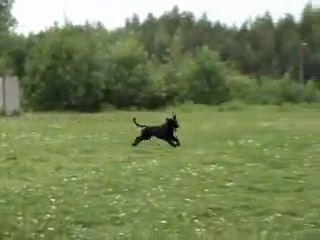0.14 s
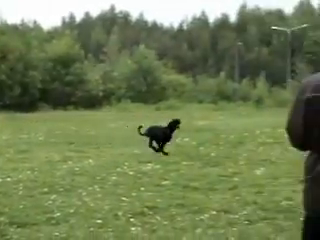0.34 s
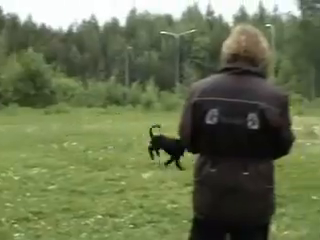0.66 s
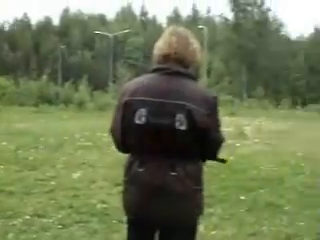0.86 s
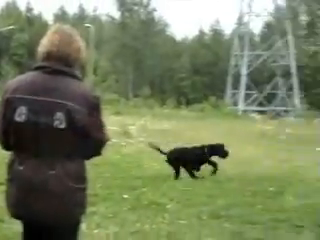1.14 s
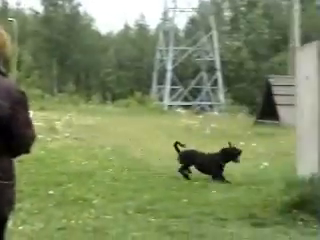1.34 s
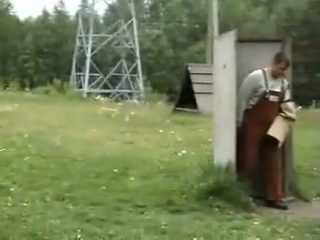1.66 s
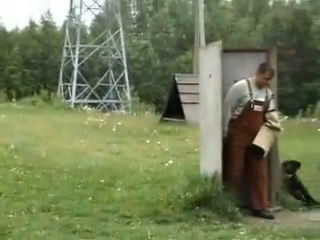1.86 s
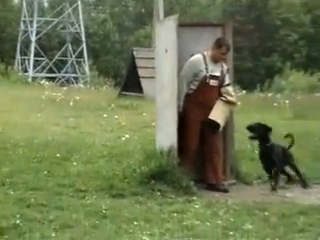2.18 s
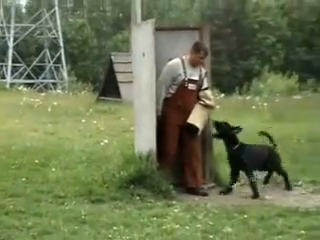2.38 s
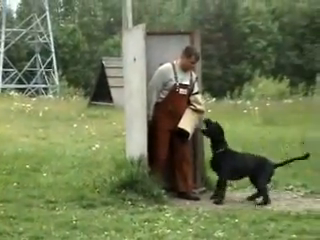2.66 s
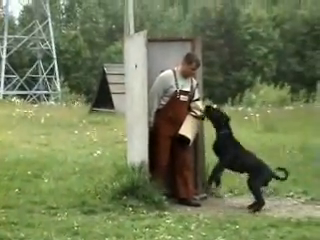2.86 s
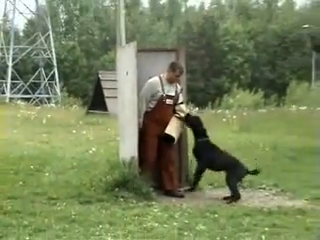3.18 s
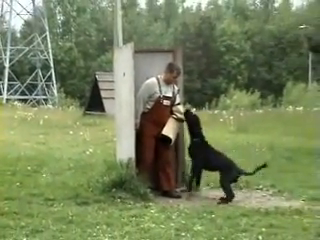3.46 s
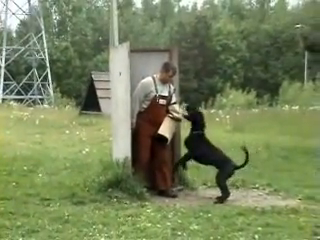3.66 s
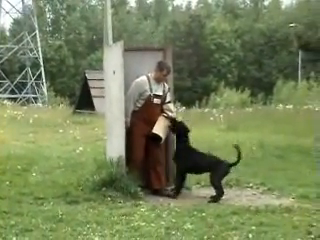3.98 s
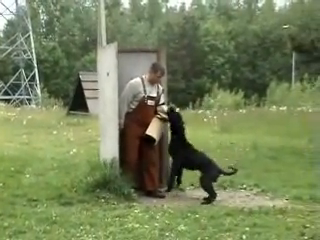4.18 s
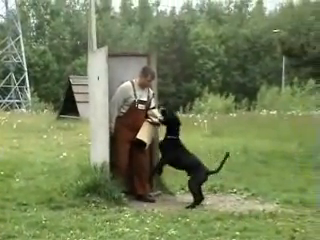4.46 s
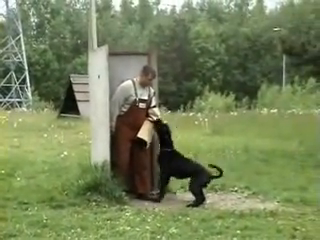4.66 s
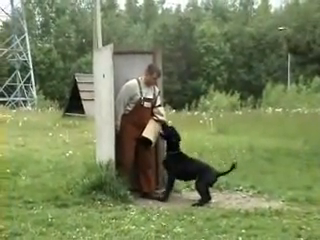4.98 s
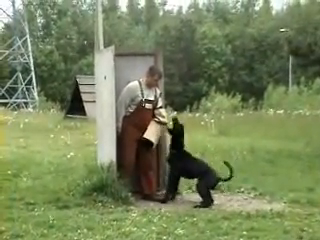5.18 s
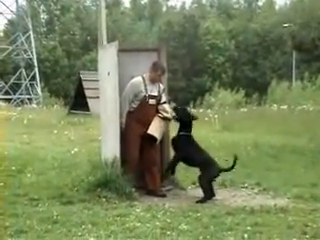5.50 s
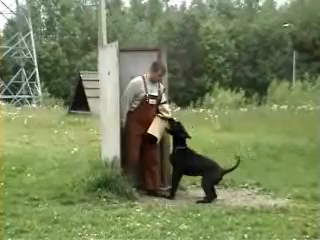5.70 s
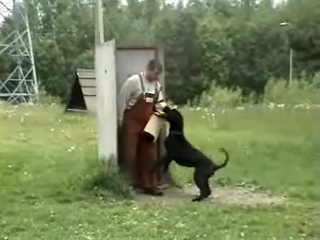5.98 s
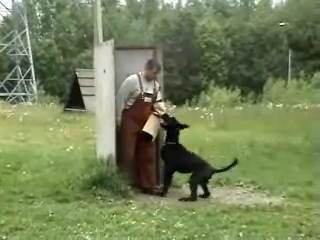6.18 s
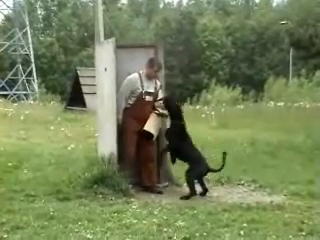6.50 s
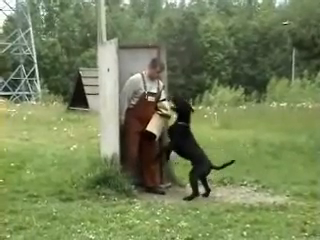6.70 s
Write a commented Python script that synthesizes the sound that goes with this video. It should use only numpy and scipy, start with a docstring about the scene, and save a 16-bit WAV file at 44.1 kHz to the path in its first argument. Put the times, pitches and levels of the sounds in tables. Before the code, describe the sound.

Thirteen rough, loud barks from a big dog outdoors, with a short pause after the first four, slight close echoes and soft grass rustle.

```python
"""A large dog barks hoarsely thirteen times in an open field, with the same faint close echoes throughout.
Each bark is a train of rough slaps and puffs of air that rings the chest, throat, mouth and muzzle.
The boards of a wooden hide send back the close echoes, and a tree line returns a faint tail.
Paws rustle in the grass as a crackle that swells and fades; far road noise is a hum of shaped noise."""
import sys
import numpy as np
from scipy import signal
from scipy.fft import rfft, irfft
from scipy.io import wavfile
from scipy.ndimage import uniform_filter1d, minimum_filter1d

SR = 44100
rng = np.random.default_rng(int(sys.argv[2]) if len(sys.argv) > 2 else 0)


def wav_record(signal):
    """Record a signal, one row per channel, as 16-bit PCM in the file named by sys.argv[1]."""
    frames = np.transpose(np.atleast_2d(signal))
    bounded = np.clip(frames, -1, 1)
    # unit amplitude maps onto the largest positive 16-bit level
    quanta = np.round(bounded * 32767).astype(np.int16)
    wavfile.write(sys.argv[1], SR, quanta)


def ratio_of_db(decibels):
    """Turn decibels (scalar or array-like) into linear amplitude factors; 0 dB maps to 1."""
    return 10 ** (np.asarray(decibels, float) / 20)


N = 301644  # length of the scene in samples


def read(points, hz):
    """Value of a (frequency [Hz], value) table at hz, straight on a log-frequency axis."""
    f, value = np.transpose(points)
    return np.interp(np.log(hz + 1), np.log(f + 1), value)


def evened(x):
    """Scales to rms 1."""
    return x / np.sqrt(np.mean(x ** 2) + 1e-20)


def add(mix, s, sound):
    """Mixes sound in at time s, in seconds."""
    part = mix[round(s * SR):][:len(sound)]
    part += sound[:len(part)]


def colour(x, points):
    """Filters x by a (frequency [Hz], gain [dB]) spectrum."""
    gain = ratio_of_db(read(points, np.fft.rfftfreq(x.shape[-1], 1 / SR)))
    return irfft(rfft(x) * gain, x.shape[-1])


def resonate(x, hz, width):
    """A hollow that rings: two-stage resonance, width in Hz, that follows the pitch curve hz; rms 1."""
    turn = np.exp(2j * np.pi * np.cumsum(hz * np.ones(len(x))) / SR)
    r = np.exp(-np.pi * width / SR)
    # turn the pitch down to zero, smooth twice, then turn it back up
    smoothed = signal.lfilter([1], np.convolve([1, -r], [1, -r]), x / turn)
    return evened((turn * smoothed).real)


def wander(size, span):
    """Smooth chance, rms 1, changing over about span samples."""
    once = uniform_filter1d(rng.standard_normal(size), round(span))
    return evened(uniform_filter1d(once, round(span)))


def dog():
    """All the barks in a row, each with its own effort, pitch, mouth, folds and tongue."""
    # one list a bark, of (time [s], effort [dB], jaw opening as mouth level over throat level [dB])
    bark_rows = [
        [(.47, -36, 3), (.503, -18, -1), (.514, -6.5, 10), (.56, -10, 6), (.598, -12.5, 3.5), (.626, -26.5, 8),
         (.67, -34.5, 7)],
        [(.815, -35.5, 0), (.843, -14.5, 4.5), (.871, -9, -5.5), (.895, -8, 4.5), (.92, -17.5, 0.5),
         (.963, -21.5, -4), (1.0, -33.5, -5)],
        [(1.14, -37, -0.5), (1.166, -20.5, 6.5), (1.176, -16, 8), (1.216, -9, 0.5), (1.24, -13.5, -3.5),
         (1.288, -26, -4.5), (1.31, -24, -19), (1.345, -36, -12)],
        [(1.49, -35, -2), (1.515, -20, 0), (1.528, -6, 3), (1.546, -7.5, -12.5), (1.568, -11, 0.5),
         (1.6, -17, -11), (1.63, -26, -7.5), (1.675, -36, -8.5)],
        [(2.865, -35.5, 0), (2.9, -23.5, -3), (2.913, -9, -8.5), (2.937, -13, 5.5), (2.957, -4.5, -6.5),
         (2.98, -12, 10), (3.015, -20.5, -9), (3.031, -17, -4.5), (3.075, -28.5, -17), (3.09, -32, -11)],
        [(3.225, -48.5, 3.5), (3.245, -29, -3.5), (3.257, -7.5, -3.5), (3.28, -13, 0.5), (3.305, -6, 10),
         (3.325, -16.5, 3), (3.351, -12.5, 1), (3.395, -25, -11.5), (3.43, -35, -6.5)],
        [(3.535, -34.5, 10), (3.553, -14, 10), (3.571, -8.5, -6), (3.6, -13, -5), (3.635, -5, 4.5),
         (3.663, -18.5, -11), (3.685, -19.5, -10.5), (3.74, -29.5, -10.5)],
        [(3.88, -34, 8.5), (3.9, -20, 6), (3.914, -7.5, -9), (3.946, -9.5, 2.5), (3.985, -13, 11.5),
         (4.0, -23, 5), (4.014, -21, 1.5), (4.05, -22, -13.5), (4.085, -32.5, -10)],
        [(4.26, -32, -4.5), (4.294, -21, 2), (4.304, -8, 1.5), (4.334, -16, -1), (4.346, -9.5, 9),
         (4.378, -13.5, 14), (4.392, -24, 5.5), (4.44, -26.5, -17), (4.46, -33, -4.5)],
        [(4.715, -37, 2), (4.745, -20, 2), (4.763, -7.5, 0), (4.79, -10, 12), (4.843, -21, 2),
         (4.865, -14, 3.5), (4.893, -21.5, -14.5), (4.925, -34, 1)],
        [(5.315, -51.5, 6), (5.327, -22, 10), (5.342, -8, 6.5), (5.37, -13, 11.5), (5.415, -10.5, 14),
         (5.437, -29, 0), (5.473, -22.5, -4.5), (5.51, -38, -7)],
        [(5.93, -33, 11), (5.946, -21, 10), (5.958, -8.5, 7), (5.99, -10, 12), (6.022, -12, 11),
         (6.036, -25.5, 3.5), (6.065, -25, -2), (6.082, -18.5, 0.5), (6.12, -34.5, -11)],
        [(6.525, -43.5, 5), (6.537, -20.5, 10), (6.549, -8.5, 3), (6.583, -10.5, 14), (6.625, -21, 19),
         (6.641, -27, 5), (6.657, -19.5, 12), (6.7, -38, -0.5)],
    ]
    # one row a bark: (onset time [s], throat pitch [Hz], how long it holds [s],
    # throat pitch after the break, before any sag [Hz])
    voices = [(0.511, 513.5, 0.086, 473), (.84, 563.6, 0.07, 444), (1.17, 540, 0.046, 441.3),
              (1.52, 543.1, .045, 428), (2.908, 593.4, 0.061, 460.8), (3.257, 615.7, 0.048, 446.2),
              (3.558, 628, .065, 465.4), (3.908, 654.6, 0.053, 497.2), (4.299, 639.6, .035, 418),
              (4.754, 623, 0.049, 421), (5.335, 641, 0.045, 479.7), (5.953, 618.2, 0.059, 438.5),
              (6.546, 645, 0.033, 516.5)]
    # one row a bark: (mouth pitch at onset [Hz], mouth glide [Hz per s],
    # muzzle level against the effort [dB], boost as the lips part again [dB])
    mouths = [(1593, -5000, -6, 1), (1517, -3000, -8.5, 6), (928, 2, -3.5, 14), (1133, 1505, -6.5, 10.5),
              (1017, 1005, -21, 15.5), (873, -300, -12, 6.5), (1106, 1, -15, 8), (844, 803, -16, 14),
              (1010, -4, -15.5, 15.5), (995, -1200, -12.5, 6), (1010.4, -400, -21.5, 12.5),
              (991, 206, -21, 10.5), (1021, -200, -18.5, 12)]
    # one row a bark: (throat cycles per fold slap [count], roughness of the free folds [0-1])
    folds = [(1, .65), (1, .55), (1, .65), (1, .55), (2, .45), (1.5, .4), (2, .55), (2, .45), (1.5, .55),
             (1.5, .55), (3, .6), (2, .6), (1, .6)]
    # a second mouth resonance set by the tongue, one row a bark:
    # (pitch [Hz], level against the mouth band [dB])
    tongues = [(985, -1), (982, 0.5), (1500, -6.5), (1643, -10), (1490, -14), (1360, -6), (1530, -8.5),
               (1360, -15.5), (1480, -12), (1363, -10), (1530, -18.5), (1510, -14.5), (1364, -16.5)]
    barks = np.zeros(N)
    for rows, voice, mouth, fold, tongue in zip(bark_rows, voices, mouths, folds, tongues):
        add(barks, rows[0][0], bark(shape(rows, *voice, *mouth), *fold, *tongue))
    return barks


def shape(rows, onset, top_hz, hold, low_hz, start_hz, glide, muzzle_db, lips_db):
    """Effort is shared between throat and mouth by the jaw; pitch and lips follow the time since onset."""
    s, *columns = np.transpose(rows)
    t = np.arange(s[0], s[-1], 1 / SR)
    effort_db, jaw_db = (np.interp(t, s, c) for c in columns)
    age = t - onset
    # after its hold the throat pitch drops a step within 15 ms and also sags, down to a floor
    break_s, sag_hz_per_s, throat_floor_hz = .015, 1500, 330.4
    broken = np.clip((age - hold) / break_s, 0, 1)
    sag_hz = sag_hz_per_s * np.maximum(age - hold, 0)
    throat_hz = np.maximum(top_hz + (low_hz - top_hz) * broken - sag_hz, throat_floor_hz)
    throat_db = effort_db - 10 * np.log10(1 + ratio_of_db(jaw_db) ** 2)
    mouth_db = throat_db + jaw_db
    mouth_hz = start_hz + glide * np.maximum(age, 0)
    # the lips part once more after the onset and brighten the muzzle
    lips_s, lips_span_s = 0.1265, 0.0099
    parted_db = lips_db * np.exp(-((age - lips_s) / lips_span_s) ** 2)
    parted_db += 0.32 * jaw_db  # a wider jaw also lifts the muzzle
    parted_db += 300 * np.minimum(age, 0)  # dB per s: before the onset the muzzle is still opening
    return throat_hz, throat_db, mouth_hz, mouth_db, effort_db + muzzle_db + parted_db


def fold_drive(throat_hz, throat_db, mouth_hz, mouth_db, cycles, rough):
    """Vocal folds slap unevenly in step with throat or mouth; a noisy puff of air follows each slap."""
    size = len(throat_hz)
    free_hz = throat_hz / cycles
    # a ringing mouth pulls the folds onto a whole fraction of its own pitch, and steadies them
    locked = mouth_db > throat_db + 11
    fold_hz = np.where(locked, mouth_hz / np.round(mouth_hz / free_hz), free_hz)
    rough = rough * uniform_filter1d(np.where(locked, .8, 1), size=200)
    turns = np.cumsum(fold_hz * (1 + .17 * rough * wander(size, 130))) / SR
    force = ratio_of_db(5.84 * rough * wander(size, 90))  # chaotic folds: uneven blows
    slaps = np.diff(np.floor(turns), prepend=0) * force  # one click at each whole turn
    puffs = (0.82 + np.exp(-(turns % 1) / 0.86)) * force * rng.standard_normal(size)
    drive = (1 - rough) * evened(slaps) + rough * evened(puffs)
    return drive, puffs


def teeth_hiss(puffs, airflow, muzzle_db):
    """Puffs of air ring in the gaps past the teeth, strongest with the muzzle open."""
    # (pitch [Hz], width [Hz], level among the rings [dB])
    teeth_rings = [(2920, 1080, 1.5), (4010, 1840, 1.5), (4950, 1300, -4), (6240, 400, -14)]
    size = len(puffs)
    rings = 0
    for hz, width, db in teeth_rings:
        rings = rings + ratio_of_db(db) * resonate(puffs, hz * (1 + 0.086 * wander(size, 900)), width)
    gusts = ratio_of_db(0.28 * wander(size, 500))  # slight patches in the level
    breath_db = -24.5  # against the blend of airflow and muzzle
    return ratio_of_db(breath_db) * np.sqrt(airflow * ratio_of_db(muzzle_db)) * gusts * rings


def bark(controls, cycles, rough, tongue_hz, tongue_db):
    """Slaps and puffs of the folds ring chest, throat, mouth and muzzle, each a resonance of its own."""
    throat_hz, throat_db, mouth_hz, mouth_db, muzzle_db = controls
    size = len(throat_hz)
    mouth_hz = mouth_hz * (1 + 0.045 * wander(size, 720))  # the jaw trembles
    drive, puffs = fold_drive(throat_hz, throat_db, mouth_hz, mouth_db, cycles, rough)
    airflow = np.hypot(ratio_of_db(throat_db), ratio_of_db(mouth_db))
    # resonances take pitch and width in Hz; chest and cavity levels are in dB against the airflow
    chest = ratio_of_db(-15) * airflow * resonate(drive, 314.3, 128)
    throat = ratio_of_db(throat_db) * resonate(drive, throat_hz * (1 + 0.035 * wander(size, 520)), 160)
    cavity = ratio_of_db(-10.5) * airflow * resonate(drive, 986, 420)  # the damped walls of the open jaw
    tongue = ratio_of_db(tongue_db) * resonate(drive, tongue_hz, 265)
    mouth = ratio_of_db(mouth_db) * (resonate(drive, mouth_hz, 200) - tongue)
    lips_shift = 1 + .025 * wander(size, 1200)  # the lips move the muzzle pitch a little
    muzzle = ratio_of_db(muzzle_db) * resonate(drive, 2063 * lips_shift, 383)
    hiss = teeth_hiss(puffs, airflow, muzzle_db)
    voice = chest - throat + cavity + mouth + muzzle + hiss
    return voice * signal.windows.tukey(size, .15)  # soft start and end


def hide(x):
    """The boards send a close echo to each side, 97 and 151 samples late and of opposite sign."""
    return np.array([np.roll(x, 97), -np.roll(x, 151)])


def field(x):
    """Sparse echoes of random sign from hide, ground and trees, each band dying at its own speed."""
    # (frequency [Hz], time to fall by 60 dB [s])
    fall_times = [(250, 0.97), (1000, 0.52), (4000, 0.67)]
    taps = np.zeros((2, SR))
    # one echo at a chance place in every 20 samples
    at = np.arange(500, SR - 20, 20) + rng.integers(0, 20, (2, (SR - 501) // 20))
    np.put_along_axis(taps, at, rng.choice([-1., 1.], at.shape), 1)
    hz, t, z = signal.stft(taps, SR, nperseg=256)
    fading = ratio_of_db(-60 * t / read(fall_times, hz)[:, None])
    tail = signal.istft(z * fading, SR, nperseg=256)[1]
    tail = tail + 0.28 * tail[::-1]  # each side hears a little of the other
    return signal.fftconvolve(x[None], tail / np.linalg.norm(tail[0]), axes=1)[:, :N]


def rustle():
    """Paws in grass: dense small crackles of the blades, swelling and fading with each swish."""
    # (middle time [s], length [s], level at the middle [dB])
    swish_rows = [(0.177, 0.55, -50), (0.891, 0.52, -49.5), (1.501, 0.75, -46.5), (1.86, 0.19, -51.5),
                  (2.094, .16, -44.5), (2.264, 0.091, -42.5), (2.444, .3, -55), (6.75, 0.16, -47)]
    # (frequency [Hz], relative level per Hz [dB])
    grass_spectrum = [(800, -21), (2000, 16.5), (4000, 3), (8000, -2)]
    struck = rng.random(N) < 5000 / SR  # about 5000 crackles a second
    blades = rng.standard_normal(N) * ratio_of_db(1.1 * rng.exponential(1, N)) * struck
    t = np.arange(N) / SR
    swishes = sum(ratio_of_db(db) * np.exp(-(2 * (t - s) / length) ** 2) for s, length, db in swish_rows)
    return swishes * evened(colour(blades, grass_spectrum))


def road():
    """Distant traffic: random short-time spectra with drifting patches."""
    # (frequency [Hz], relative level per Hz [dB])
    hum_spectrum = [(25, -25), (75, 0.5), (140, 3), (215, 0.5), (290, -9.5), (390, -8), (520, -3),
                    (1010, 1), (1670, -7), (2700, -17.5), (4500, -26), (7800, -36.5)]
    # (time [s], level [dB])
    hum_level = [(0, -32.5), (.7, -32), (1.5, -32.5), (1.999, -34), (3.6, -33), (4.598, -36), (6.84, -36.5)]
    # (frequency [Hz], left-right likeness where 1 is the same sound [0-1])
    likeness = [(30, .7), (60, 0.95), (170, 0.81), (300, 0.94), (2500, 0.5)]
    frames, hz = N // 256 + 5, np.fft.rfftfreq(1024, 1 / SR)
    a, b, c, d, patches = rng.standard_normal((frames, 513, 5)).T
    patches = evened(uniform_filter1d(uniform_filter1d(patches, 5, 0), 16, 1))
    same = np.clip(read(likeness, hz), -1, 1)[:, None]
    left = a + 1j * b
    right = same * left + np.sqrt(1 - same ** 2) * (c + 1j * d)
    z = np.array([left, right]) * ratio_of_db(read(hum_spectrum, hz)[:, None] + 1.6 * patches)
    hum = evened(signal.istft(z, nperseg=1024, noverlap=768)[1][:, :N])
    return ratio_of_db(np.interp(np.arange(N) / SR, *np.transpose(hum_level))) * hum


def scene():
    """Dog, its echoes, grass and road."""
    barks = dog()
    return barks + ratio_of_db(-21) * hide(barks) + ratio_of_db(-17.5) * field(barks) + rustle() + road()


def roll_off(x):
    """The treble ends steeply here."""
    return signal.sosfilt(signal.butter(12, 7890, fs=SR, output="sos"), x)


def record(dry):
    """An uneven microphone pair; then left and right made alike in the treble, a fast limiter,
    a treble limit and hard overload."""
    # microphone pair: (frequency [Hz], left minus right level [dB])
    balance = [(100, -1.5), (500, 3), (1500, 4), (2500, 2.5)]
    left = colour(dry[0], [(hz, db / 2) for hz, db in balance])
    right = colour(dry[1], [(hz, -db / 2) for hz, db in balance])
    mid = (left + right) / 2
    # apart from the microphones: the treble sounds almost the same in both channels
    alike_hz = 3400
    side = colour((left - right) / 2, [(alike_hz, 0), (1.73 * alike_hz, -25)])
    peak = -minimum_filter1d(-abs(mid), size=131)  # loudest swing in a 3 ms window
    over_db = np.maximum(20 * np.log10(peak + 1e-9) + 5.9, 0)  # how far it passes -5.9 dB
    held = np.array([mid + side, mid - side]) / ratio_of_db(0.54 * uniform_filter1d(over_db, size=131))
    edge_hz = 7900  # little is left above this
    low_pass = signal.firwin(511, edge_hz, window=("kaiser", 9), fs=SR)
    narrow = signal.oaconvolve(held, low_pass[None], "same")
    mix = np.clip(narrow, -1, 1)
    return roll_off(mix)


dry = scene()
out = record(dry)
wav_record(out)
```